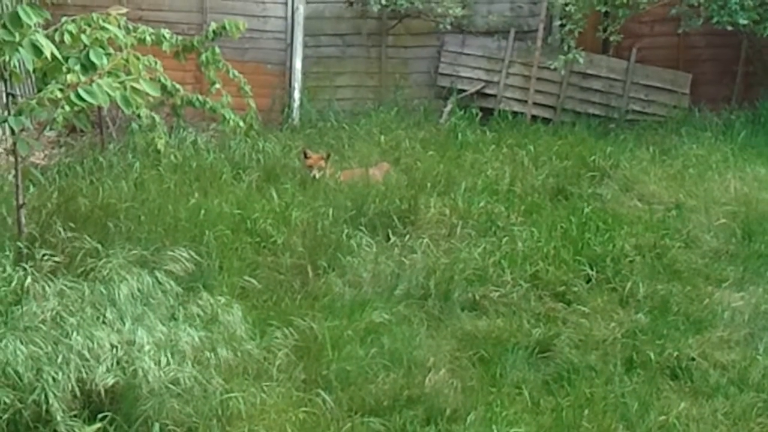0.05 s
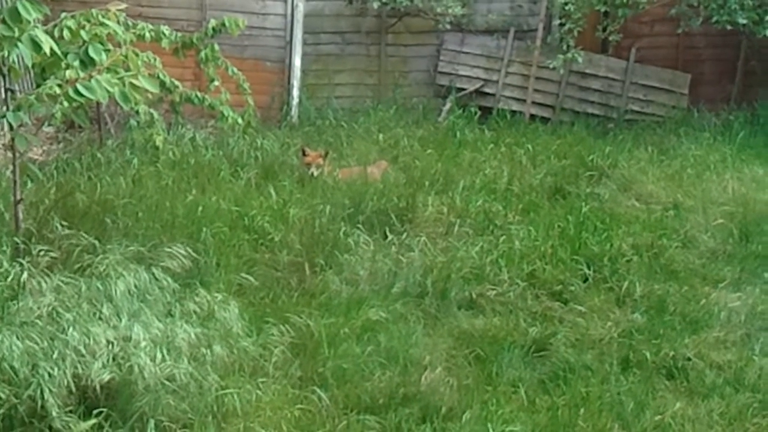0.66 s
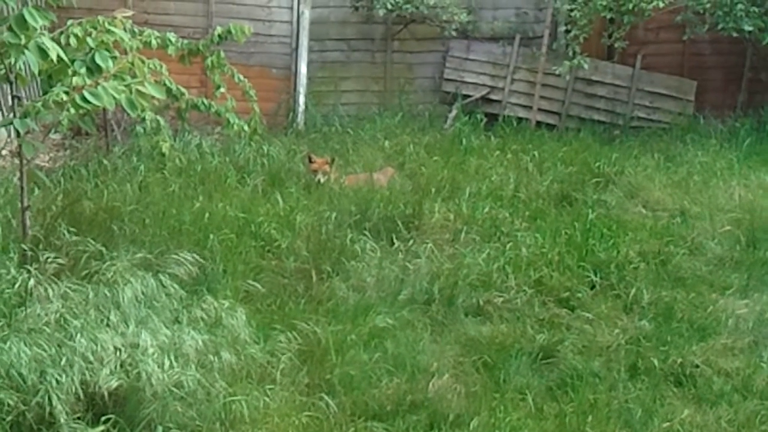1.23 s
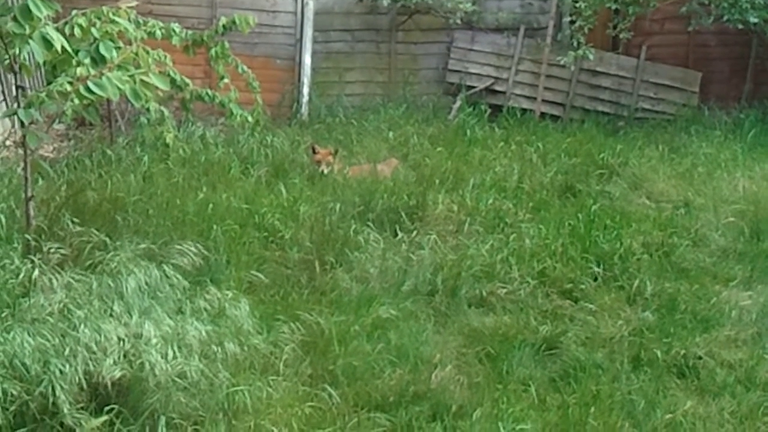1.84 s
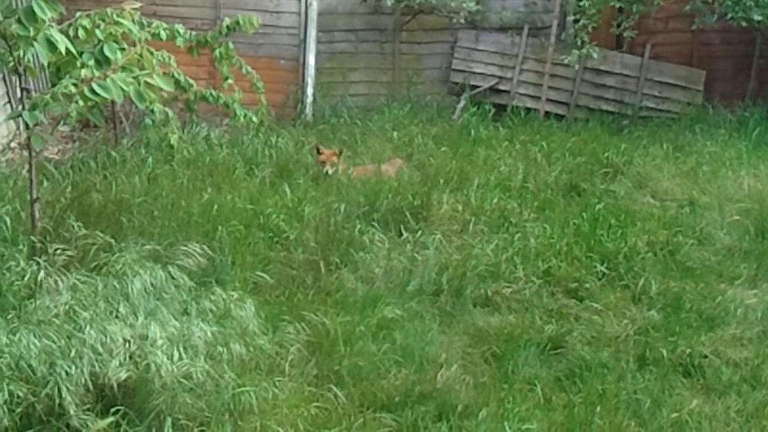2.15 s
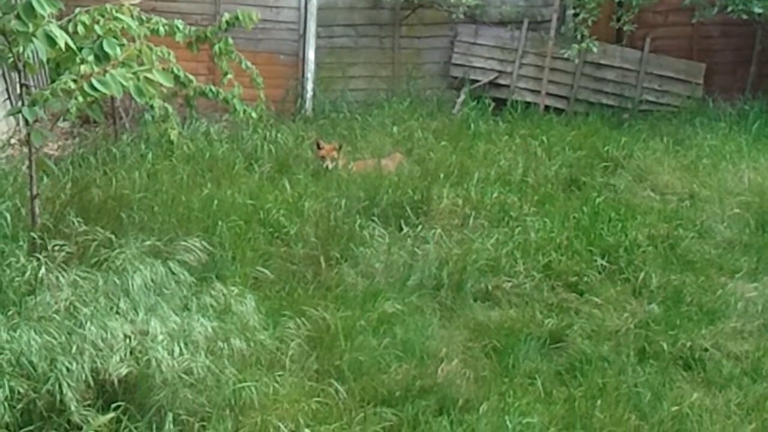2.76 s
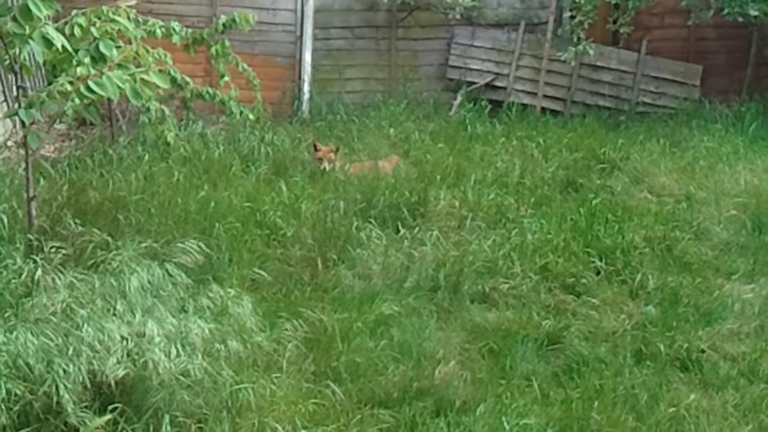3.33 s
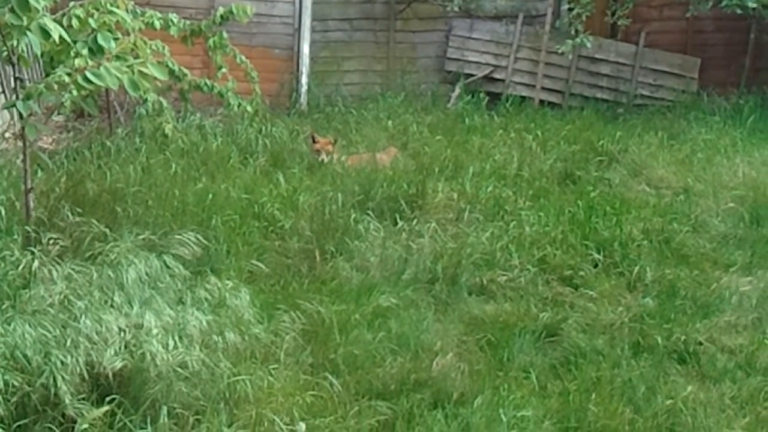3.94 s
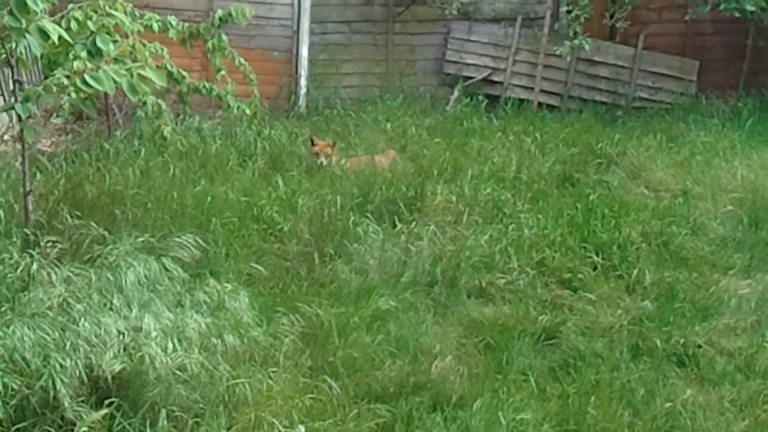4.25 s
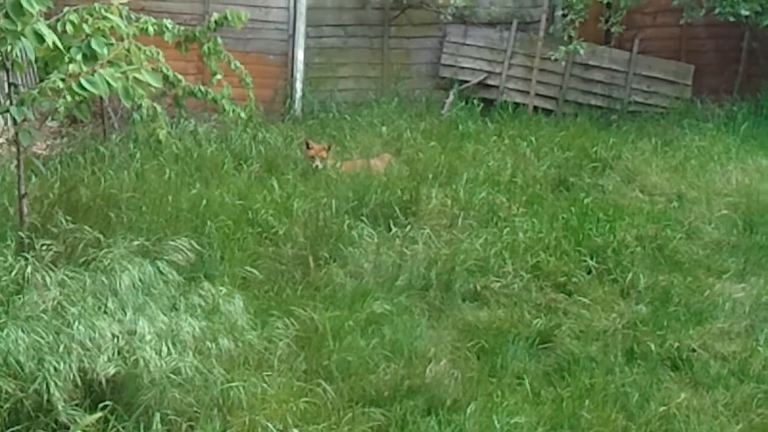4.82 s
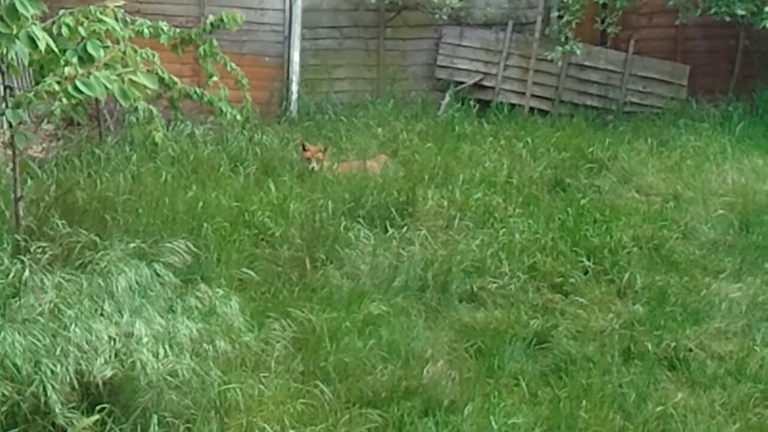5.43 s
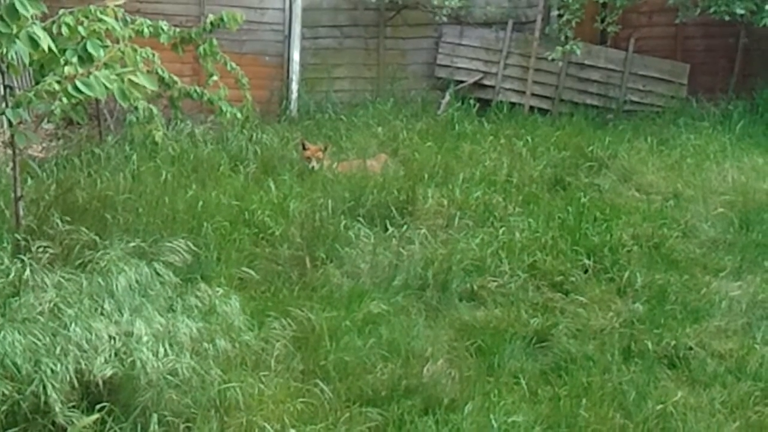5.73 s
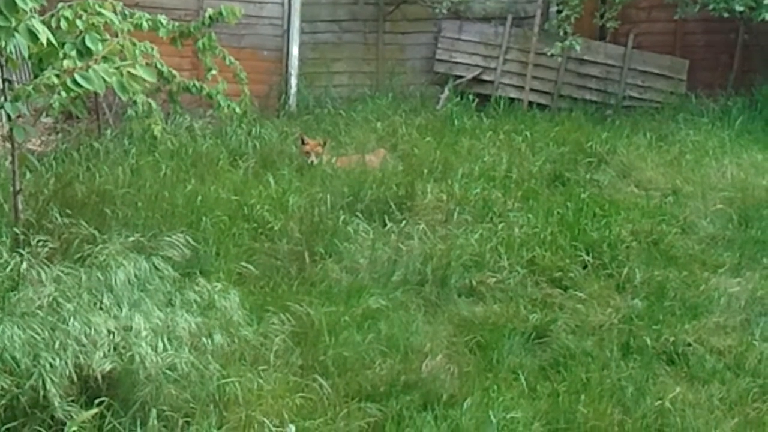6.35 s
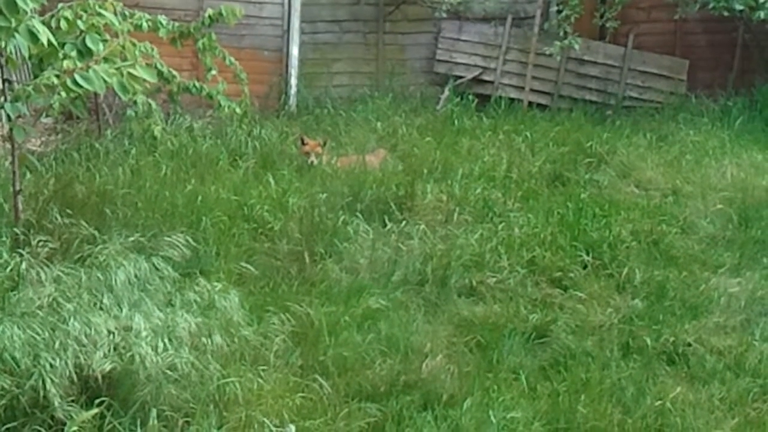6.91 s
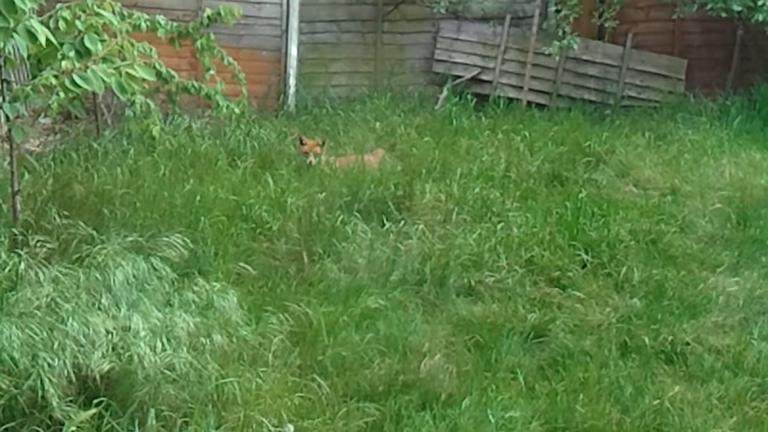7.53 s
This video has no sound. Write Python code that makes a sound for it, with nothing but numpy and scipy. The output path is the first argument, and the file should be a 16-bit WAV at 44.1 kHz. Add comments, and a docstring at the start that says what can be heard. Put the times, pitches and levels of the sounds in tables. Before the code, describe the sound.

Three knocks on a rattling window pane, then three quicker ones, heard indoors with hissing pipes, a soft motor and a small bird outside.

```python
"""A knuckle raps on a window, two sets of three knocks, heard indoors just behind the glass.
Each blow thumps the pane, sets it ringing and rattles it in its frame. In the room a household machine
draws water, hissing through its pipes; the flow stops with a spurt, and later its motor whirrs and hums.
Out in the garden a small bird whistles short, falling calls, and a faint rush swells twice."""
import sys
import numpy as np
from scipy import signal
from scipy.fft import irfft, next_fast_len
from scipy.io import wavfile

SR = 44100
rng = np.random.default_rng(int(sys.argv[2]) if len(sys.argv) > 2 else 0)


def dump_mix(stems):
    """Bounce the given channels to the path in sys.argv[1] as a 16-bit WAV at rate SR."""
    frames = np.atleast_2d(stems).T  # one column per channel
    limited = np.clip(frames, -1, 1)  # hard clip at full scale
    pcm = np.round(limited * 32767).astype(np.int16)
    wavfile.write(sys.argv[1], SR, pcm)


N = 333837


def knocks(rattle_db, rattle_peak_s):
    """Every blow lands on one spot; harder ones are brighter and shake the pane in its frame."""
    # Each row: start in seconds, strength in dB.
    raps = [(2.6835, -1.5), (3.1179, 1), (3.5538, 4), (4.7728, 2.5), (5.0011, 2), (5.2320, 5)]
    # The rattle's colour. Each row: frequency in Hz, relative level in dB.
    rattle_colour = [(800, -23), (1800, 9.5), (3000, 7), (4200, -5), (5000, -0.5), (6200, -5), (7200, -4)]
    contact_hz, db_per_octave = 1500, 4.5   # brightness of a 0 dB blow; extra strength that doubles it
    rattle_growth = 2.5   # dB of rattle per dB of blow
    out, t = np.zeros(N), np.arange(int(.8 * SR)) / SR
    response = window_response(t, push_db=4.0, ring_db=-1.5, push_s=0.00014)
    shake = (t / rattle_peak_s * np.exp(1 - t / rattle_peak_s)) ** 3
    for s, db in raps:
        corner_hz = contact_hz * 2 ** (db / db_per_octave)
        pole = np.exp(-2 * np.pi * corner_hz / SR)
        blow = from_db(db) * signal.lfilter([(1 - pole) ** 2], [1, -2 * pole, pole * pole], response)
        rattle = from_db(rattle_db + rattle_growth * db) * shake * coloured(rattle_colour, len(t))
        add(out, blow + rattle, s)
    return out


def window_response(t, push_db, ring_db, push_s):
    """The pane shoves the air once, echoes follow, and glass and room ring on."""
    # Modes of pane and frame. Each row: frequency in Hz, relative level in dB, T60 in seconds.
    modes = [(47, -44, 0.71), (59, -42, 0.5), (81, -38, 0.82), (110, -31, 0.19), (151, -22, 0.36),
             (165, -35, 0.29), (206, -33, 0.22), (233, -33, 0.31), (301, -27, 0.41), (390, -31, 0.38),
             (448, -22, 0.15), (553, -22, 0.18), (602, -25, 0.25), (658, -32, 0.34), (696, -19, 0.2),
             (781, -20, 0.16), (928, -28, 0.3), (1088, -27, 0.2), (1148, -30, 0.16), (1213, -32, 0.22),
             (1264, -31, 0.26), (1306, -27, 0.24), (1488, -25, 0.22), (1570, -28, 0.3), (1641, -26, 0.21),
             (1730, -20, 0.16), (1785, -29, 0.28), (1876, -24, 0.28), (1933, -22, 0.22), (2110, -23, 0.17)]
    # Slaps off the recess, sill and near walls. Each row: delay in milliseconds, gain.
    echoes = [(1.76, 0.25), (2.22, -0.47), (4.17, 0.25), (5.3, 0.027), (6.73, 0.26), (12.9, -0.14)]
    pulse = lambda delay_s: np.exp(-((t - delay_s - push_s) / push_s) ** 2)
    push = pulse(0) + sum(gain * pulse(ms / 1000) for ms, gain in echoes)
    ring = sum(from_db(db - 60 * t / t60) * np.cos(2 * np.pi * hz * t) for hz, db, t60 in modes)
    ring *= 1 - np.exp(-(t / push_s) ** 2)   # the glass takes a moment to get moving
    return from_db(push_db) * push + from_db(ring_db) * ring + room_tail(t, level_db=-9.0)


def room_tail(t, level_db):
    """The room's diffuse reverb: each band blooms and dies at its own rate."""
    # Each row: frequency in Hz, relative level in dB.
    colour = [(50, -6), (150, -16.5), (260, -7.5), (380, -11.5), (550, 0.5), (750, 2.5), (950, -1),
              (1100, -2.5), (1250, -4), (1550, -1.5), (1950, 0.5), (2400, -9), (3100, -5.5), (4000, -10.5),
              (7200, -9)]
    # Each row: frequency in Hz, build-up time in seconds.
    build_times = [(1800, 0.0012), (2600, 0.0023), (5000, 0.01)]
    # Each row: frequency in Hz, T60 in seconds.
    decay_times = [(60, 0.51), (200, 0.39), (700, 0.16), (1500, 0.22), (2600, .24), (6000, 0.22)]
    out, edges = np.zeros(len(t)), np.geomspace(40, 10000, 13)
    for low, high in zip(edges, edges[1:]):
        hz = np.sqrt(low * high)
        band_pass = signal.butter(2, [low, high], "band", fs=SR, output="sos")
        band = signal.sosfilt(band_pass, coloured(colour, len(t)))
        bloom = 1 - np.exp(-t / at_hz(build_times, hz))
        out += band * bloom * from_db(-60 * t / at_hz(decay_times, hz))
    return from_db(level_db) * out


def water(t, level_db):
    """Water hisses steadily through pipes, with a few spurts, and dies away as the valve shuts."""
    # The flow's colour. Each row: frequency in Hz, relative level in dB.
    colour = [(100, -5), (215, 5), (350, -0.5), (550, -1), (700, 5), (900, 0), (1030, -11), (1400, -10),
              (1900, -11.5), (2400, -18), (3100, -15.5), (3700, -20.5), (5200, -19.5), (7200, -19.5)]
    # Pipe resonances. Each row: centre in Hz, half-width in Hz, level in dB before pipes_db.
    pipes = [(876, 36, -48.5), (1269, 19, -60.5), (1567, 28, -53.5), (3673, 160, -60), (4216, 78, -62)]
    # Spurts and ticks. Each row: start in seconds, level in dB, centre in Hz, width in octaves,
    # decay in seconds.
    spurts = [(0, -43.5, 1725, 0.13, 0.43), (0.634, -46.5, 2500, 1.3, 0.03), (.726, -41, 1900, .7, 0.0093),
              (.872, -41.5, 1750, 0.19, 0.018), (1.438, -36, 830, 0.16, 0.014),
              (1.545, -34, 840, 0.083, 0.027), (3.83, -46, 5200, 0.59, 0.044),
              (4.295, -33.5, 4500, 3.9, 0.047), (4.296, -42, 1440, 0.33, 0.092),
              (4.619, -52, 1720, 0.41, 0.073)]
    valve_shuts_s, shut_db_per_s, pipes_db = 4.37, 142, 1.0
    flow = from_db(-shut_db_per_s * np.maximum(t - valve_shuts_s, 0))
    out = flow * (from_db(level_db) * coloured(colour) + from_db(pipes_db) * resonant(pipes))
    age = t[:SR]
    attack = 1 - np.exp(-age / 0.00084)
    for s, db, centre_hz, octaves, decay_s in spurts:
        hiss = band_noise(centre_hz, octaves, len(age))
        add(out, from_db(db) * hiss * attack * np.exp(-age / decay_s), s)
    return out


def motor(t, whirr_level_db):
    """The motor fades up to a steady whirr and thin whine; its mains hum swells in bouts."""
    # Low and upper mains harmonics. Each row: frequency in Hz, base level in dB.
    low_lines = [(199.3, -42), (398.6, -54.5)]
    upper_lines = [(301, -56.5), (500.5, -49), (699.8, -52), (797, -52), (899, -55.5)]
    # Each row: start and end in seconds, gain of the low hum and of the upper hum in dB.
    bouts = [(5.336, 6.04, 0, -3), (6.052, 6.4, -8.5, -4.5), (7.13, 7.65, -10, -6.5)]
    # Each row: frequency in Hz, relative level in dB.
    whirr_colour = [(150, -23), (350, -9), (550, 4.5), (780, 5), (1020, -5.5), (1500, -4), (2200, -13),
                    (2800, -16.5), (4000, -16.5), (7200, -22.5)]
    # Rough drone and thin whine. Each row: centre in Hz, half-width in Hz, level in dB.
    whine = [(742, 37, -48), (2580, 61, -64.5), (2976, 50, -67.5)]
    starts_s, run_up_s, resting_hum_db = 5.1, 0.43, -11
    running = np.clip((t - starts_s) / run_up_s, 0, 1)
    low, upper = hum(t, low_lines, waver=0.16), hum(t, upper_lines, waver=0.46)
    tones = from_db(resting_hum_db) * running * (low + upper)
    for start_s, end_s, low_db, upper_db in bouts:
        swell = held(t, start_s, end_s, fade_s=0.09)
        tones += swell * (from_db(low_db) * low + from_db(upper_db) * upper)
    return tones + running * (from_db(whirr_level_db) * coloured(whirr_colour) + resonant(whine))


def hum(t, lines, waver):
    """Steady pitches, each wavering slowly in level."""
    out = np.zeros(len(t))
    for hz, db in lines:
        tone = np.sqrt(2) * np.sin(2 * np.pi * (hz * t + rng.random()))
        out += from_db(db) * tone * (1 + waver * noise(lambda f: np.exp(-f / 4)))
    return out


def bird():
    """Each call is a falling whistle and a softer, lower note, which may be repeated."""
    # Each row: start in seconds, level in dB, number of low notes after the whistle.
    calls = [(.266, -39.5, 1), (.881, -38, 1), (2.742, -38.5, 1), (3.519, -38.5, 1), (5.639, -39, 1),
             (6.664, -39.5, 2), (7.333, -34.5, 1)]
    note_spacing_s, low_note_db, repeat_loss_db = .094, -8.5, 4
    out = np.zeros(N)
    for s, db, low_notes in calls:
        whistle = chirp(length_s=.062, top_hz=5900, top_s=.023, sag_hz=1700, waver=.017)
        add(out, from_db(db) * whistle, s)
        for k in range(round(low_notes)):
            note = chirp(length_s=.06, top_hz=4940, top_s=.038, sag_hz=260, waver=0.02)
            add(out, from_db(db + low_note_db - k * repeat_loss_db) * note, s + (k + 1) * note_spacing_s)
    return out


def chirp(length_s, top_hz, top_s, sag_hz, waver):
    """One note swells and fades as its pitch arches; fences and leaves smear it with echoes."""
    near_decay_s, garden_db, garden_t60_s = .0025, 1.5, 0.28
    t, lag = np.arange(0, length_s, 1 / SR), np.arange(SR // 2) / SR
    near_and_far = np.exp(-lag / near_decay_s) + from_db(garden_db - 60 * lag / garden_t60_s)
    echoes = rng.standard_normal(len(lag)) * near_and_far
    wobble = 1 + waver * noise(lambda hz: np.exp(-hz / 200), len(lag))[:len(t)]
    pitch_hz = top_hz - sag_hz * ((t - top_s) / (length_s - top_s)) ** 2
    note = np.sin(np.pi * t / length_s) ** 2 * np.sin(2 * np.pi * np.cumsum(pitch_hz * wobble) / SR)
    heard = signal.fftconvolve(note, echoes)
    return heard * np.linalg.norm(note) / np.linalg.norm(heard)


def rush(t, centre_hz, octaves, fade_s):
    """A faint mid-range rush swells and sinks twice."""
    # Each row: start and end in seconds, level in dB.
    swells = [(6.39, 6.625, -50), (6.704, 6.945, -53)]
    envelope = sum(from_db(db) * held(t, start_s, end_s, fade_s) for start_s, end_s, db in swells)
    return envelope * band_noise(centre_hz, octaves)


def room_tone(level_db):
    """A dull, steady bed of noise with a low drone."""
    # Each row: frequency in Hz, relative level in dB.
    colour = [(20, -4.5), (42, 5.5), (80, -7), (130, -2.5), (175, -2), (215, -8.5), (300, -0.5), (400, -5),
              (600, -6), (770, 2), (1020, -27), (1800, -19.5), (3200, -27.5), (7200, -29)]
    # Each row: centre in Hz, half-width in Hz, level in dB.
    drone = [(97.7, 4.8, -53.5), (172.6, 8, -44)]
    return from_db(level_db) * coloured(colour) + resonant(drone)


def noise(gain_at, size=N):
    """Unit-rms noise with the gain gain_at(Hz) and random phases."""
    padded = next_fast_len(size, True)
    hz = np.arange(padded // 2 + 1) * SR / padded
    x = irfft(gain_at(hz) * np.exp(2j * np.pi * rng.random(len(hz))), padded)[:size]
    return x / np.sqrt(np.mean(x ** 2) + 1e-20)


def coloured(spectrum, size=N):
    """Unit-rms noise with a tabled spectrum."""
    return noise(lambda hz: from_db(at_hz(spectrum, hz)), size)


def resonant(rows):
    """Noise ringing in narrow resonances."""
    return sum(from_db(db) * noise(lambda hz: 1 / (1 + ((hz - centre) / half_width) ** 2))
               for centre, half_width, db in rows)


def band_noise(centre_hz, octaves, size=N):
    """Noise in one bell-shaped band."""
    return noise(lambda hz: np.exp(-.5 * (np.log2((hz + 1) / centre_hz) / octaves) ** 2), size)


def from_db(db):
    """Decibels to gain."""
    return 10 ** (np.asarray(db) / 20)


def at_hz(points, hz):
    """Read a table on a log-frequency axis."""
    f, value = np.transpose(points)
    return np.interp(np.log(hz + 1e-3), np.log(f), value)


def held(t, start_s, end_s, fade_s):
    """An envelope that fades in around start_s, holds, and fades out around end_s."""
    return np.clip(.5 + np.minimum(t - start_s, end_s - t) / fade_s, 0, 1)


def add(out, sound, s):
    """Mix a sound in from time s."""
    start = max(round(s * SR), 0)
    out[start:start + len(sound)] += sound[:len(out) - start]


def low_pass(x, hz):
    """A steep low-pass without delay."""
    return signal.fftconvolve(x, signal.firwin(401, hz, window=("kaiser", 7), fs=SR)[None], "same")


def scene():
    """All sources at one microphone just behind the glass."""
    t = np.arange(N) / SR
    indoors = room_tone(level_db=-43.5) + water(t, level_db=-40.0) + motor(t, whirr_level_db=-48)
    outdoors = bird() + rush(t, centre_hz=1360, octaves=0.47, fade_s=0.11)
    return (knocks(rattle_db=-24.5, rattle_peak_s=0.0074) + outdoors + indoors)[None]


def record(dry):
    """A narrow-band microphone rounds the loudest peaks; what overshoots is clipped."""
    dry = signal.sosfilt(signal.butter(6, 37, "high", fs=SR, output="sos"), dry)
    rounded = 1.02 * np.tanh((np.abs(dry) / 1.02) ** 3) ** (1 / 3) * np.sign(dry)
    clipped = np.clip(low_pass(rounded, hz=7450), -1, 1)
    return low_pass(clipped, hz=15600)


dry = scene()
out = record(dry)
dump_mix(out)
```